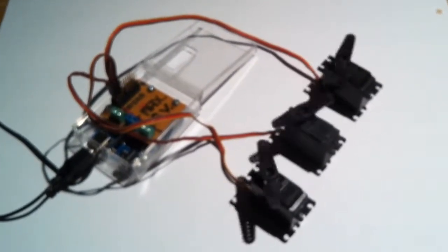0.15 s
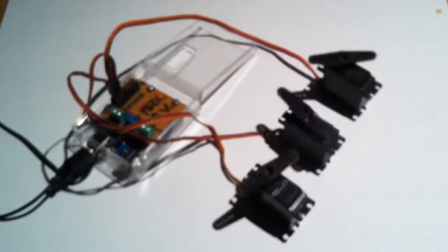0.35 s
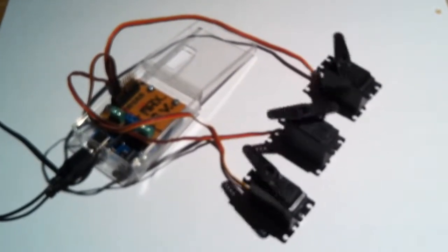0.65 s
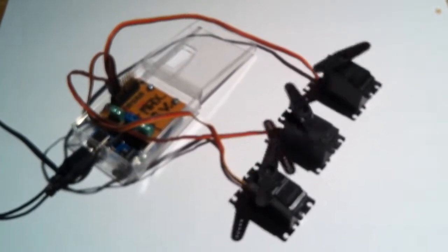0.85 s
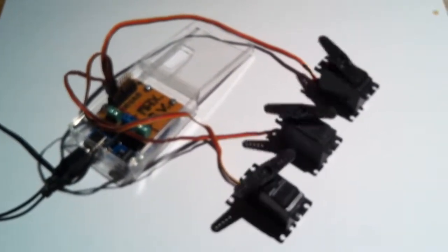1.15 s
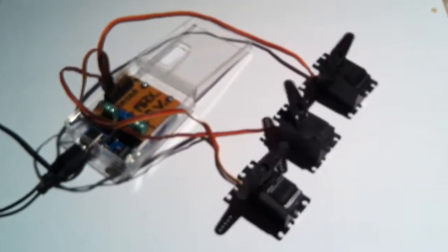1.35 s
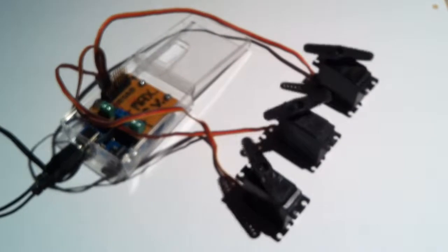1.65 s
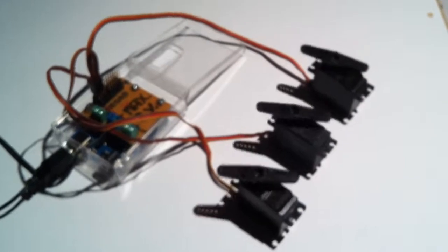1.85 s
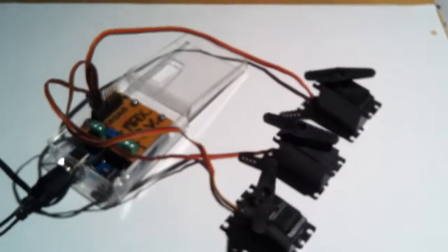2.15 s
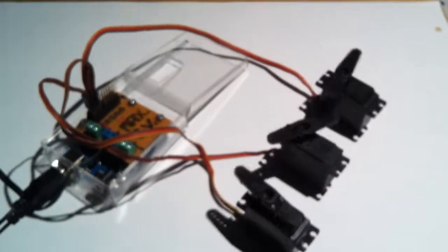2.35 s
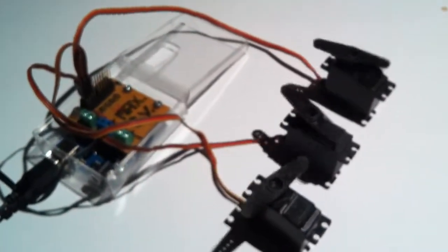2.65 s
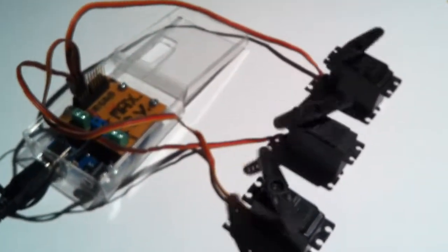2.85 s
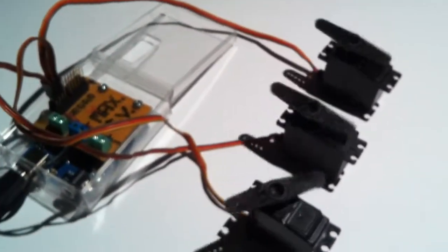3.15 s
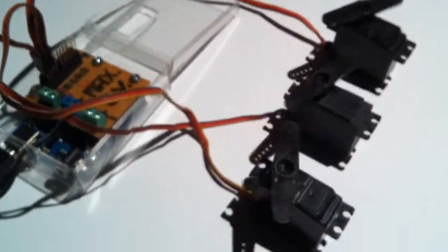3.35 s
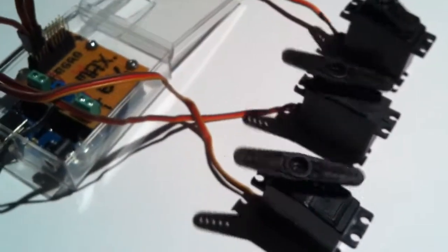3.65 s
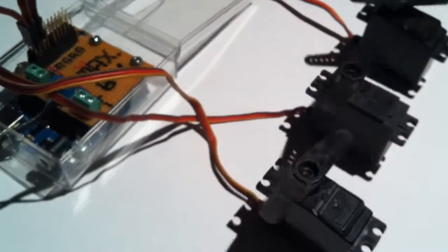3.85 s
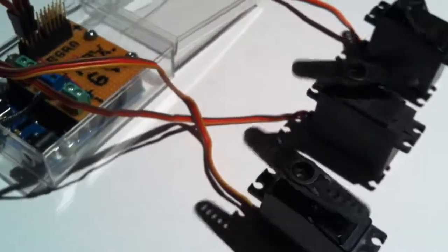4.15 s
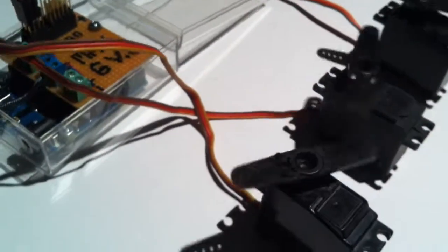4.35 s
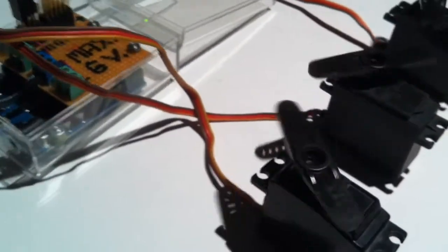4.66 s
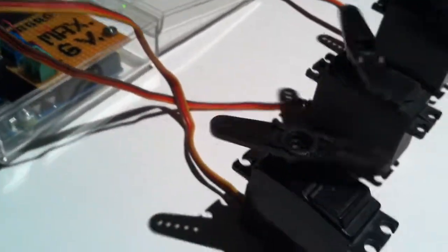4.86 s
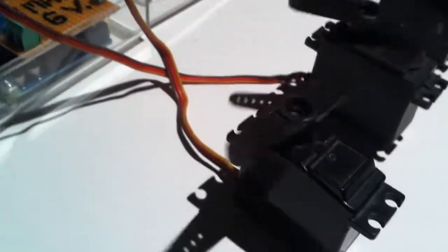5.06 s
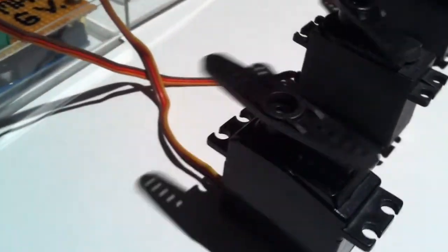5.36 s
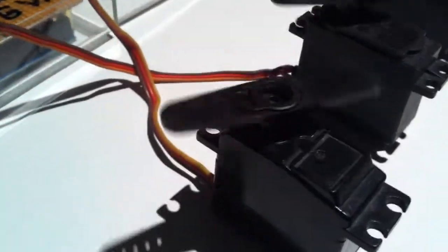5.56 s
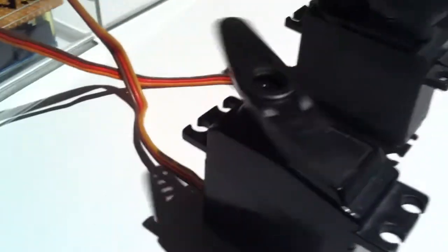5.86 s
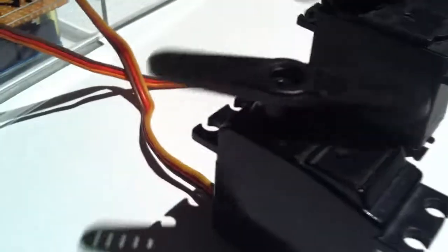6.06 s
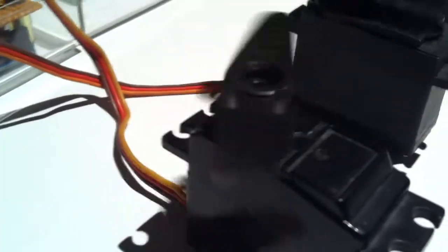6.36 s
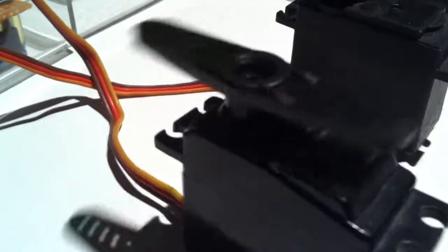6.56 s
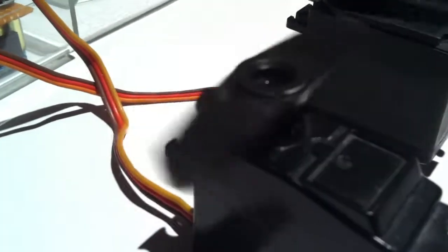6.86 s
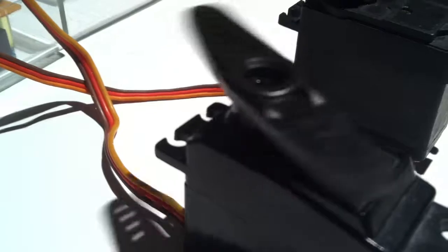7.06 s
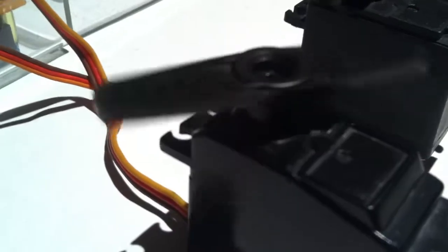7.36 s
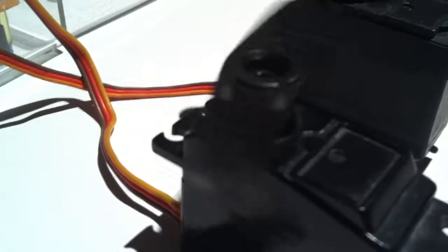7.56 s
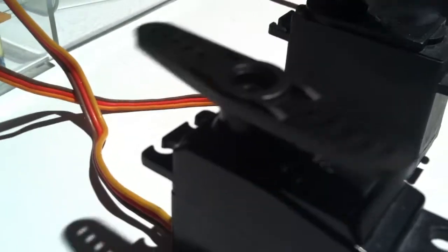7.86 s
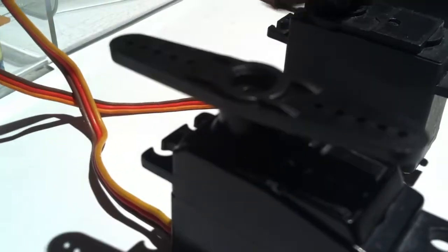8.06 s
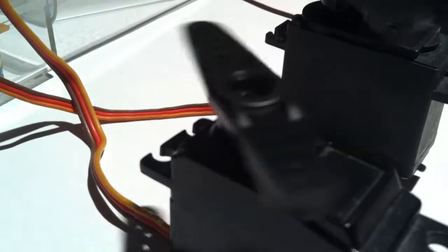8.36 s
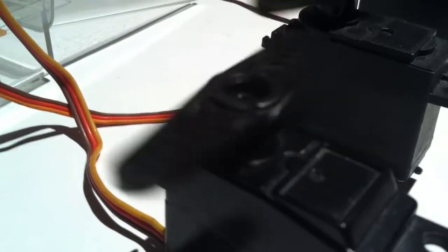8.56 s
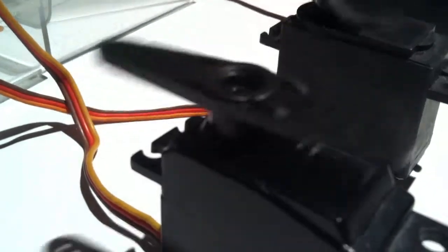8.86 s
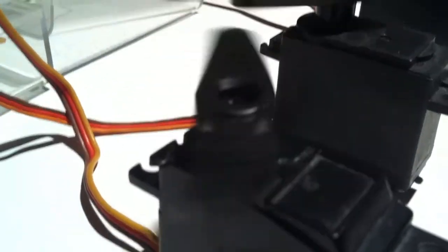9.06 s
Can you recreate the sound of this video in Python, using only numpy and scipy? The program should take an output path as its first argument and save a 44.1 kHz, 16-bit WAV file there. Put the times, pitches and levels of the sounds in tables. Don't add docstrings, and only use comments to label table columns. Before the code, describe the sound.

Thin, bright mechanical whirring from small geared motors, heard on a handheld microphone approaching them indoors. Continuous gritty gear chatter carries a shrill singing tone that drops in pitch, rests, climbs back and holds. Tiny tooth clicks tick through it, and faint soft bumps lie underneath. Near the end come a brief up-and-down whine and a final rising one, closest and loudest.

```python
import sys
import numpy as np
from scipy import signal
from scipy.fft import rfft, irfft, next_fast_len
from scipy.io import wavfile
from scipy.ndimage import uniform_filter1d, map_coordinates

SR = 44100
rng = np.random.default_rng(int(sys.argv[2]) if len(sys.argv) > 2 else 0)


def store_pcm(level_fs):
    pcm = np.round(np.clip(level_fs, -1, 1) * 32767).astype(np.int16)
    wavfile.write(sys.argv[1], SR, np.atleast_2d(pcm).T)


def boost(x):
    u = np.asarray(x, float) / 20
    return 10 ** u


N = 406161

# hz, level_db (per Hz)
ROOM_SPECTRUM = [(15, -59), (25, -31), (93, -16.5), (122, -5.5), (270, 0), (362, -5), (447, -9.5),
                 (492, -7.5), (608, -11), (703, -10), (775, -18), (926, -14), (1200, -17), (1560, -49),
                 (2640, -120)]
# start_s, pitch_hz, level_db
FAR_DRONE = [(5.55, 197.2, -61.5), (6.6, 195, -62.5), (7.2, 178.7, -65), (7.8, 174.5, -67.5)]
FAR_MURMUR = [(0, 236, -64), (.9, 237, -64.5)]
# start_s, pitch_hz, level_db
SECOND_MOTOR = [
    [(2.38, 640, -70), (2.5, 705, -66), (2.7, 741, -70), (5.3, 739, -63.5), (6.9, 735, -64),
     (7.1, 690, -66), (7.3, 535, -67)],
    [(8.0, 485, -68), (8.45, 520, -70), (8.7, 630, -64), (8.9, 697, -59), (9.21, 697, -60)],
]
THIRD_MOTOR = [
    [(0, 710, -72), (.3, 712, -68), (1.3, 708, -72)],
    [(3.2, 690, -76), (5.3, 708, -71), (6.2, 690, -69), (6.5, 708, -68), (6.9, 712, -69), (7.1, 670, -67),
     (7.35, 715, -66)],
    [(7.5, 600, -71), (7.65, 645, -66), (7.82, 500, -65), (7.97, 570, -67)],
    [(8.05, 722, -69), (8.45, 668, -66), (8.75, 700, -66), (9, 718, -63), (9.21, 716, -63)],
]
# start_s, level_db (peak), pitch_hz
BUMPS = [
    (2.214, -53, 300),
    (3.855, -51, 130),
    (8.833, -51, 222),
    (8.834, -49, 560),
]
# start_s, level_db (peak)
SNAGS = [(0.0867, -5), (0.7562, -9), (2.1725, -17), (2.392, -9), (2.5321, -10), (2.612, 0), (3.4715, -11),
         (3.6775, -6), (3.7539, -6), (3.8601, 3), (4.141, 7), (4.1914, -6), (5.3852, -7), (5.4415, -9),
         (5.5853, 5), (5.7284, -3), (5.9818, -4), (6.0267, 2), (6.1589, -1), (6.3899, -1), (6.4487, -6),
         (6.6134, -4), (7.0646, 0), (7.3023, 0), (7.5592, 0), (7.6829, 3), (8.5749, -5), (8.6547, -1),
         (9.1306, 2), (9.1646, 1)]

# start_s, level_db
RATTLE_LEVEL = [(0, -28), (1.0, -28.5), (1.4, -29), (1.5, -31), (2.1, -34), (2.62, -23), (3.2, -23.5),
                (3.92, -20), (4.4, -26.5), (5.0, -21), (5.8, -24), (6.55, -20), (7.1, -22), (7.7, -22.5),
                (8.05, -23.5), (8.3, -24), (8.7, -20), (9.21, -19.5)]
# start_s, side (number)
FACING = [(1.3, 0), (1.6, 1), (2.35, 1), (2.5, 2), (4.3, 2), (4.75, 3), (5.7, 3), (6, 4), (8.1, 4),
          (8.4, 5)]
# body_db, lid_db, shell_db, fizz_db
SIDE_LEVELS = [(-51.5, -13, -6, -0.1), (-49.5, -11, -5.5, 0.4), (-51, -16.5, -8.5, -0.2),
               (-49.5, -11, -7, -0.1), (-48.5, -9.5, -3, -0.6), (-48, -10.5, -4.5, 0.6)]
# hz, level_db (per Hz)
BODY_SPECTRUM = [(240, -38), (400, -18), (650, -22.5), (719, -18), (800, -16), (1200, -7), (1310, -7.5),
                 (2000, -4), (2600, -2.5), (4400, -120)]
# hz, level_db (per Hz)
LID_SPECTRA = [
    [(1440, -27), (2450, -10), (2640, -11), (2780, -14), (3180, -0.5), (3630, -7.5), (4900, -8.5),
     (6370, -22), (10800, -120)],
    [(1350, -35), (2300, -17), (3090, -4), (3300, -9), (3690, -12), (4900, -15), (6370, -42), (10800, -120)],
    [(1440, -22), (2450, -7), (3050, -7.5), (3910, 0.5), (4900, -11.5), (6370, -37), (10800, -120)],
    [(1440, -18), (2450, -2), (2740, -5), (3220, 0), (4200, -0.5), (4900, -2.5), (6370, -28), (10800, -120)],
    [(1440, -18), (2450, -2), (3130, 1.5), (3300, 1.5), (3660, -10), (4600, -8.5), (4900, 1), (6370, 0),
     (10800, -120)],
    [(1440, -25), (2450, -5.5), (2790, -5), (3060, 0), (3770, -5.5), (4900, -4.5), (6370, -26),
     (10800, -120)],
]
# hz, level_db (per Hz)
SHELL_SPECTRA = [
    [(2880, -17), (4900, -6.5), (6240, -2.5), (6960, -3), (8200, -6), (10700, -38), (18000, -120)],
    [(2880, -15), (4900, -9.5), (6130, -4.5), (7640, -11), (8200, -7), (10700, -12), (18000, -120)],
    [(2880, -21), (4900, -11.5), (6040, -1), (7140, -9), (8200, -7), (10700, -21), (18000, -120)],
    [(2880, -44), (4900, -6), (6060, 5.5), (6800, -10), (7220, -5.5), (8200, -6), (10700, -25),
     (18000, -120)],
    [(2880, -9), (4900, -8), (6050, 0.5), (7130, -9), (7720, -6.5), (8200, -12.5), (10700, -17),
     (18000, -120)],
    [(2880, -27), (4900, -3.5), (5990, 1.5), (6610, -3.5), (7190, -6), (8200, -11), (10700, -39),
     (18000, -120)],
]
# hz, level_db (per Hz)
FIZZ_SPECTRA = [
    [(4820, -38), (8200, -58), (8500, -5.5), (10100, -5), (11000, -2), (13500, -2), (15200, -20),
     (16000, -26)],
    [(4820, -34), (8200, -12.5), (9800, -4), (12300, 2.5), (13600, -4), (14700, -25), (16000, -19)],
    [(4820, -46), (8200, -28), (8770, -3), (9780, -3), (10400, 2), (12600, 1.5), (14300, -7.5),
     (16000, -37)],
    [(4820, -43), (8200, -20), (8940, -6.5), (9830, -7), (12200, -1), (14600, -7), (16000, -23)],
    [(4820, -43), (8200, -20.5), (9250, -1.5), (9890, -5.5), (10700, 3), (12400, 0.5), (13700, -3),
     (14900, -19), (16000, -22)],
    [(4820, -41), (8200, -11), (10100, -0.5), (12400, 1.5), (13600, -4), (14800, -14), (16000, -21)],
]
# centre_s,
# length_s, lid_loss_db, bright_loss_db
RESTS = [(1.37, 0.39, 7, 3), (1.967, .06, -1.5, -1), (2.416, 0.12, 5, 2), (4.47, .1, -0.5, 0),
         (5.68, 0.072, 2, -1), (7.274, .06, 1.5, 3), (7.414, 0.023, -3, 8), (7.76, 0.088, -2.5, 1.5),
         (8.207, .26, 7.5, 4)]

# start_s, wheel_speed (turns per s)
RUN_A = [(0, 45.5), (.7, 45.05), (.8, 44.1), (1.0, 42.3), (1.1, 42.3), (1.25, 43.65), (1.33, 42.9),
         (1.6, 31), (1.8, 27)]
RUN_B = [(2.55, 35.5), (2.8, 41.7), (3.1, 43.7), (3.7, 44.6), (5.8, 44.65), (6.2, 43.83), (6.7, 42.06),
         (6.85, 39.5), (7.15, 30)]
RUN_C = [(7.52, 29), (7.59, 38.5), (7.66, 29)]
RUN_D = [(7.85, 27), (7.99, 34), (8.08, 41.3), (8.17, 42.7), (8.42, 40.6), (8.5, 41.1), (8.9, 45.04),
         (9.21, 45.47)]
# warble_rad, swell (share), lead_rad, second_db, third_db, fifth_db (overtones)
RUNOUT = [
    (0.65, 0.44, 2.7, 2.5, -5.5, 12),
    (1.37, 0.48, 1.25, -12, -1, 3),
    (1.1, 0.6, 0.28, -12, 10, -15),
    (0.81, 0.35, 1.3, -2.5, -2.5, -8),
]
# start_s, level_db
SINGING_LEVEL = [(.22, -53), (.34, -49), (.7, -47), (1.05, -44), (1.3, -45.5), (1.8, -37.5), (2.5, -43),
                 (3.0, -46.5), (3.6, -42.5), (4.7, -39.5), (5.4, -38), (6.4, -34.5), (6.9, -40), (7.6, -35),
                 (8.1, -33.5), (8.45, -34.5), (8.8, -33.5), (9.21, -33)]
# centre_hz, width_hz, lift_db
SHELL_RING = (6190, 500, 11)
# start_s, drop_db, recovery_s
DUCKS = [
    (4.15, -2.5, 0.28),
    (6.632, 6.5, 0.16),
    (7.69, 1, 0.3),
]

TEETH = 50
FULL_SPEED = 45.6


def unit(x):
    return x / np.sqrt(np.mean(x ** 2) + 1e-20)


def curves(rows):
    s, *cols = np.transpose(rows)
    return [np.interp(np.arange(N) / SR, s, c) for c in cols]


def window(rows, fade=0.033):
    t = np.arange(N) / SR
    return np.clip(np.minimum(t - rows[0][0], rows[-1][0] - t) / fade + 1, 0, 1)


def wobble(rate):
    values = rng.standard_normal(int(N * rate / SR) + 4)
    return map_coordinates(values, [np.arange(N) * rate / SR], order=1)


def turns(hz):
    return 2 * np.pi * np.cumsum(hz + np.zeros(N)) / SR


def coloured(x, points):
    m = next_fast_len(N + 8192)
    f, db = np.transpose(points)
    log_hz = np.log(np.fft.rfftfreq(m, 1 / SR) + 1)
    gain = boost(np.interp(log_hz, np.log(f), db, -120, -120))
    return unit(irfft(rfft(x, m) * gain, m)[:N])


def room():
    return boost(-61.5 + 1.1 * wobble(3)) * coloured(rng.standard_normal(N), ROOM_SPECTRUM)


def unsteady_tone(rows):
    hz, db = curves(rows)
    angle = turns(hz + 1.43 * wobble(5.4)) + 0.39 * wobble(12)
    return window(rows, fade=0.06) * boost(db + 2.5 * wobble(12)), angle


def far_machines():
    out = np.zeros(N)
    for rows in [FAR_DRONE, FAR_MURMUR]:
        loudness, angle = unsteady_tone(rows)
        out += loudness * np.sin(angle)
    return out


def motor_hum():
    out = np.zeros(N)
    for rows in SECOND_MOTOR + THIRD_MOTOR:
        loudness, angle = unsteady_tone(rows)
        gears = np.sin(angle * 5 / 3) + 0.8 * np.sin(angle * 20 / 9)
        out += loudness * (np.sin(angle) + 1.3 * gears)
    return out


def bumps():
    out, t = np.zeros(N + 2000), np.arange(2000) / SR
    for s, db, hz in BUMPS:
        age = t * hz * 1.7
        push = age * np.exp(-age) * np.sin(2 * np.pi * hz * t)
        out[round(s * SR):][:2000] += boost(db + 12.5) * push
    return out[:N]


def snags():
    length = 130
    burst = np.zeros(N + length)
    for s, db in SNAGS:
        scrape = rng.standard_normal(length) * np.hanning(length)
        burst[round(s * SR):][:length] += boost(db - 12) * scrape
    bright = signal.butter(N=3, Wn=[7000, 13800], btype="band", fs=SR, output="sos")
    return signal.sosfilt(bright, burst)[:N]


def singer_speed():
    return curves(RUN_A + RUN_B + RUN_C + RUN_D)[0]


def chatter():
    singer = turns(singer_speed())
    other = turns(47.0 + 0.62 * wobble(2.074))
    singer_beat = 0.58 * np.cos(singer) + 1.1 * np.cos(2 * singer)
    other_beat = 1.1 * np.cos(other) + 1.06 * np.cos(2 * other)
    shafts = 0.57 * np.cos(turns(235 + 2 * wobble(1.4))) + 1.5 * np.cos(5 * singer)
    clumps = 0.14 * wobble(9.7) + 0.35 * wobble(70) + 1.18 * wobble(300) + 1.9 * wobble(1200)
    return singer_beat + other_beat + shafts + clumps


def impacts(shake_db, depth):
    return boost(depth * shake_db + 0.8 * wobble(40)) * rng.standard_normal(N)


def faced(x, spectra, sides_db):
    side = curves(FACING)[0]
    out = np.zeros(N)
    for k, (spectrum, db) in enumerate(zip(spectra, sides_db)):
        share = np.sqrt(np.clip(1 - abs(side - k), 0, 1))
        out += share * boost(db) * coloured(x, spectrum)
    return out


def rattle():
    level_db, t = curves(RATTLE_LEVEL)[0], np.arange(N) / SR
    resting = [np.exp(-(2 * (t - s) / length) ** 4) for s, length, _, _ in RESTS]
    lid_loss, bright_loss = np.transpose(RESTS)[2:] @ resting
    body_db, lid_db, shell_db, fizz_db = np.transpose(SIDE_LEVELS)
    shake_db = chatter()

    idle_db = 0.17 * (FULL_SPEED - singer_speed())
    body_swing_db = 0.62 * (level_db + 25.5) + 1.4 * wobble(14) - idle_db
    body = faced(impacts(shake_db, 0.25), [BODY_SPECTRUM] * len(SIDE_LEVELS), body_db)

    lid = faced(impacts(shake_db, 0.58), LID_SPECTRA, lid_db)
    shell = faced(impacts(shake_db, 0.38), SHELL_SPECTRA, shell_db)
    fizz = faced(impacts(shake_db, 0.88), FIZZ_SPECTRA, fizz_db)
    light_parts = boost(-lid_loss) * lid + boost(-bright_loss) * (shell + fizz)
    return boost(body_swing_db) * body + boost(level_db) * light_parts


def mesh():
    out, (level_db,) = np.zeros(N), curves(SINGING_LEVEL)
    ring_hz, width_hz, ring_db = SHELL_RING
    for rows, runout in zip((RUN_A, RUN_B, RUN_C, RUN_D), RUNOUT):
        warble, swell, lead, second_db, third_db, fifth_db = runout
        speed = uniform_filter1d(curves(rows)[0], size=2600)
        wheel = turns(speed)
        slowing = FULL_SPEED - speed
        tone_db = level_db - 1.42 * np.maximum(slowing - 3.5, 0)
        lift_db = ring_db / (1 + ((3 * TEETH * speed - ring_hz) / width_hz) ** 2)
        slack = (0.31 + 0.032 * slowing) * wobble(30) + 0.41 * wobble(8)
        swing = unit(1 + swell * np.cos(wheel + lead) + 0.11 * np.cos(2 * wheel))
        voices = [(1, 0, 0.81, 0.048),
                  (2, second_db - 4 * slowing, 0.85, 0.1),
                  (3, third_db + lift_db + 0.84 * wobble(7), 2.15, 0.056),
                  (5, fifth_db - 4 * slowing, 3.0, 0.06)]
        for k, db, spread, smear in voices:
            rough = np.clip(0.1 * k + smear * slowing, 0, 0.97)
            grit = np.sqrt(1 - rough ** 2) + 1.4 * rough * wobble(120 + 130 * k)
            warbling = spread * warble * (1.12 + 0.27 * wobble(4)) * np.sin(wheel)
            angle = k * (TEETH * wheel + slack) + warbling
            out += window(rows) * boost(tone_db + db + 3) * grit * swing * np.sin(angle)
    return out


def scene():
    background = room() + far_machines() + motor_hum() + bumps()
    return (background + snags() + rattle() + mesh())[None]


def ducking():
    t = np.arange(N) / SR
    drop_db = np.zeros(N)
    for s, db, recovery in DUCKS:
        drop_db += db * (t > s) * np.exp(-np.maximum(t - s, 0) / recovery)
    return boost(-drop_db)


def thin_treble(x, margin_db):
    hz, _, z = signal.stft(x, SR, nperseg=2048)
    bands = (abs(z[:1024]) ** 2).reshape(64, 16, -1).mean(axis=1)
    band_hz = hz[:1024:16, None]
    uneven = uniform_filter1d(rng.standard_normal(bands.shape), size=2, axis=1)
    need_db = margin_db + 3 * (band_hz > 15100) + 3.7 * uneven
    weak = (bands < bands.mean(axis=0) * boost(-2 * need_db)) & (band_hz > 6800)
    z[:1024][np.repeat(weak, 16, axis=0)] = 0
    return signal.istft(z, SR, nperseg=2048)[1][:N]


def low_pass(x):
    return signal.sosfilt(signal.butter(12, 16130, fs=SR, output="sos"), x)


def record(dry):
    dry = dry * ducking()
    soft = dry / (1 + abs(dry / 0.75) ** 4) ** 0.25
    m = next_fast_len(N)
    below_top = np.fft.rfftfreq(m, 1 / SR) < 16100
    kept = irfft(rfft(soft, m) * below_top, m)[:, :N]
    mix = thin_treble(kept[0], margin_db=13.0)[None]
    return low_pass(mix)


dry = scene()
out = record(dry)
store_pcm(out)
```